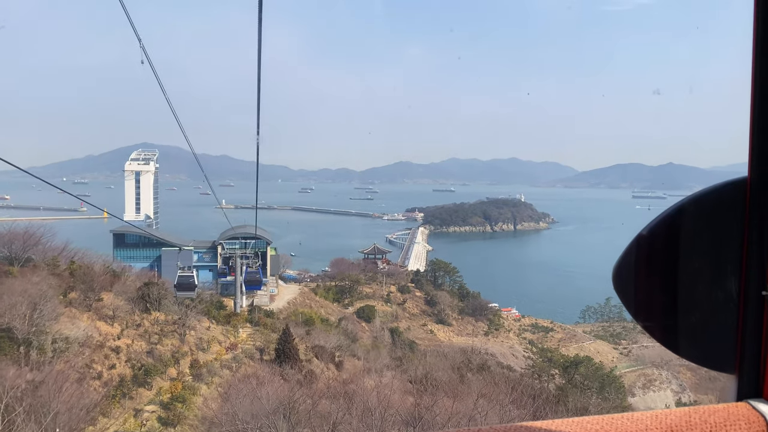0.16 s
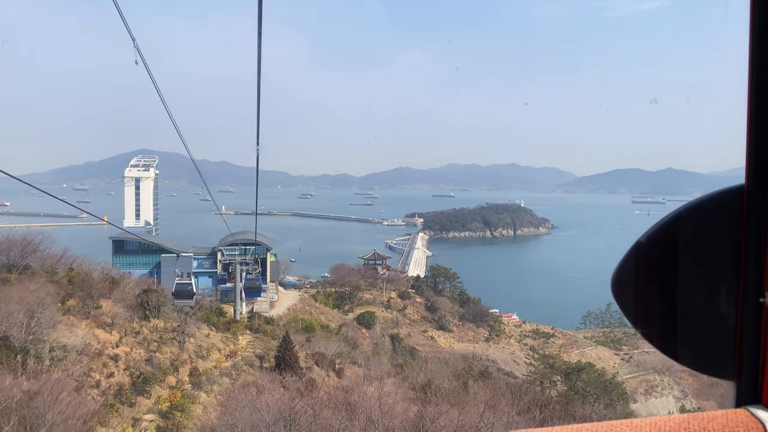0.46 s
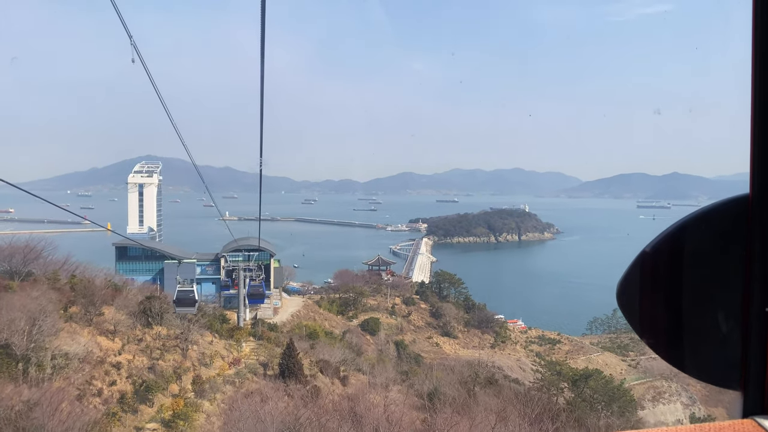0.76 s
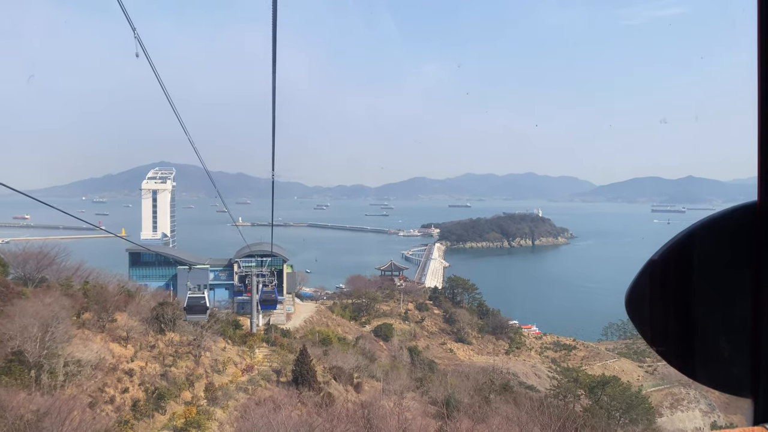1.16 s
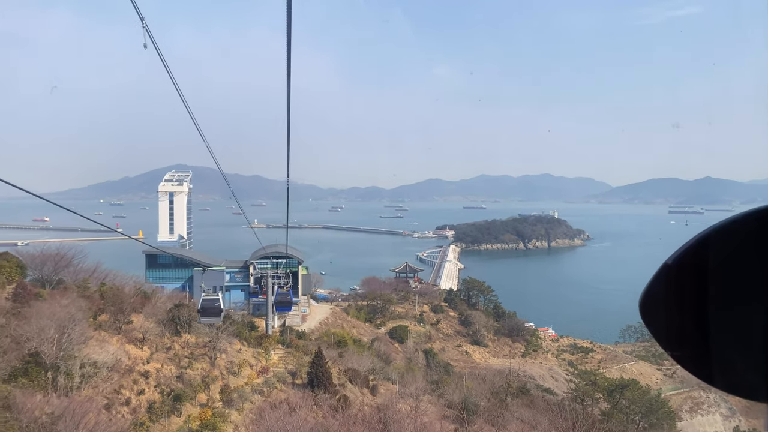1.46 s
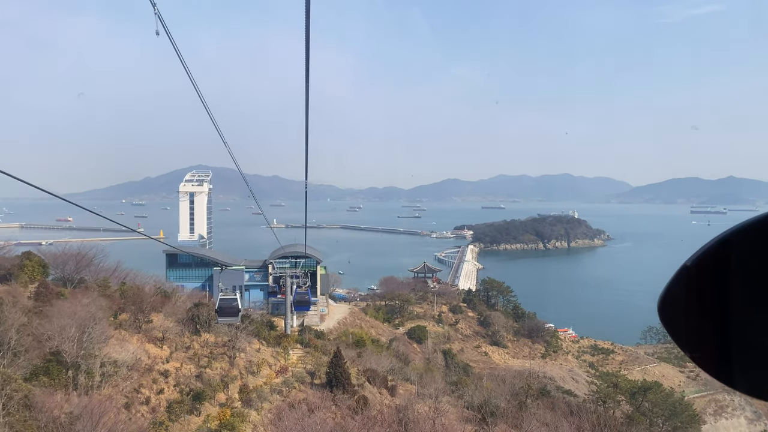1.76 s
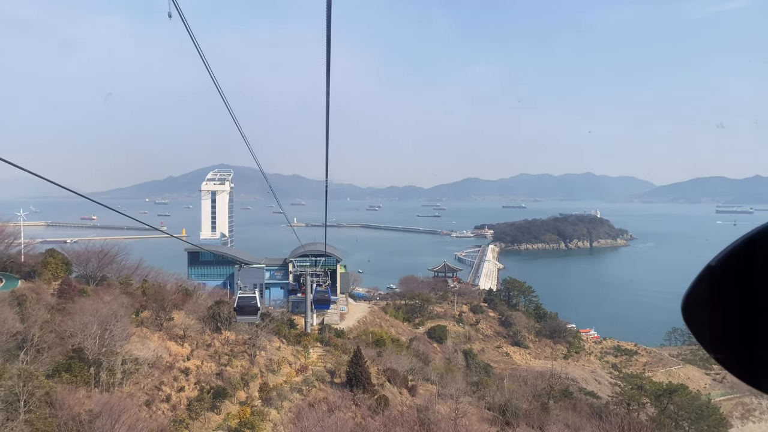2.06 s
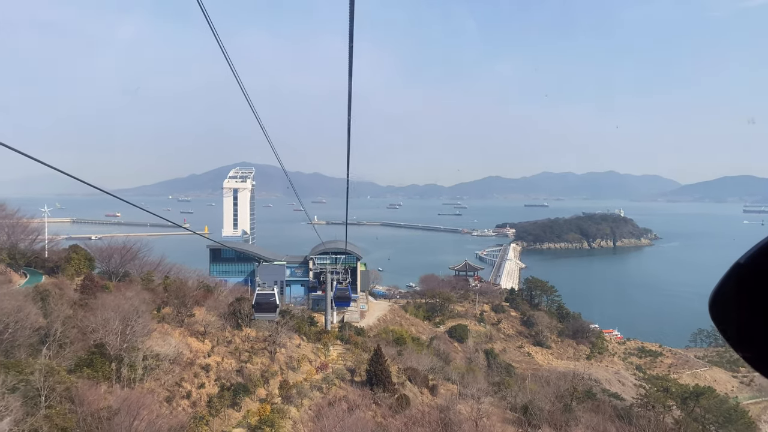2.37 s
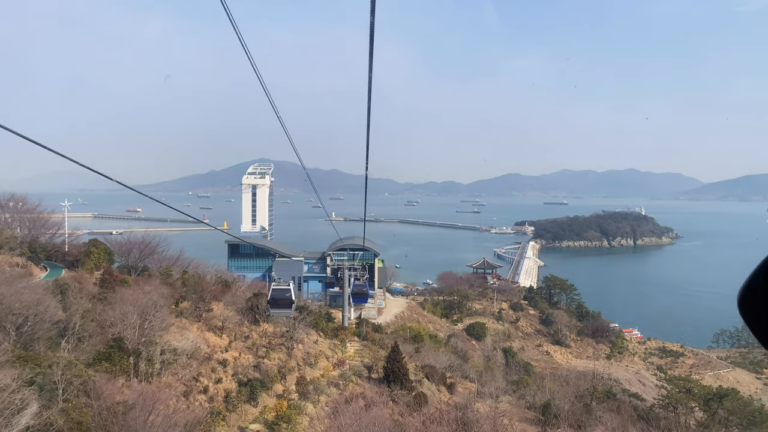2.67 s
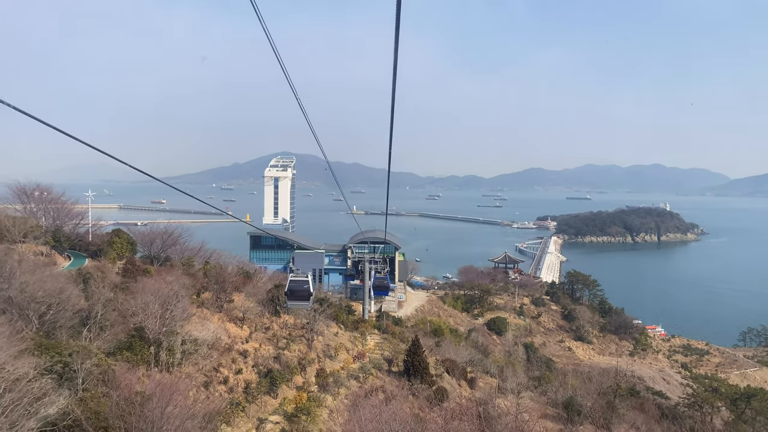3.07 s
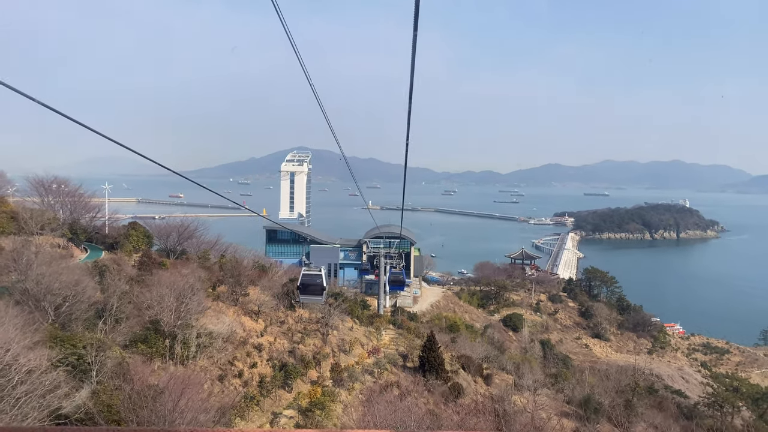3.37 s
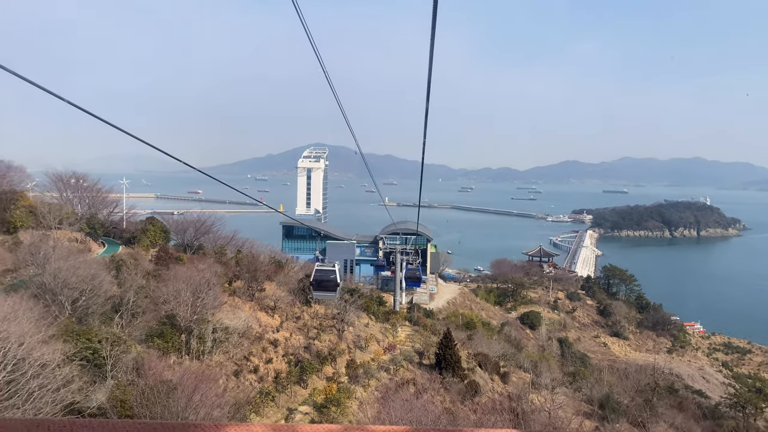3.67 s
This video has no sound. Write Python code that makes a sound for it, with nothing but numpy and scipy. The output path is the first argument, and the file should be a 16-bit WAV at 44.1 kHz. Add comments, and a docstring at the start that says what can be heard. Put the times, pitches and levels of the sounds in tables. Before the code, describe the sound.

Inside a moving cable car, a deep unsteady drone swells quickly near a support, panels thudding and loose fittings buzzing, then drops back to soft boom and muffled outside air, heard from within the cabin.

```python
"""Inside a cable car gondola: the running rope, an unsteady low sine over bass noise, shakes the cabin and swells
for about two seconds near a support. Sine hums and a throbbing boom waver in the shell over resonant noise.
Panels ring in struck modes and shudder in resonant noise with grainy scuffs; loose fittings rattle in narrow-band
bursts, and light clacks snap and ring in decaying noise. A thin noise hiss rises and fades over the outside air,
itself broad noise with gusts."""
import sys
import numpy as np
from scipy import signal
from scipy.fft import rfft, irfft, next_fast_len
from scipy.io import wavfile
from scipy.ndimage import uniform_filter1d, map_coordinates

SR = 44100
rng = np.random.default_rng(int(sys.argv[2]) if len(sys.argv) > 2 else 0)


def store_pcm(level_fs):
    """Save levels as 16-bit WAV."""
    pcm = np.round(np.clip(level_fs, -1, 1) * 32767).astype(np.int16)
    wavfile.write(sys.argv[1], SR, np.atleast_2d(pcm).T)


N = 167580  # length in samples

# In every resonance table, half-width is where the response is 6 dB down.
ROPE_HZ = 38.7  # the rope's shake at cruising speed
RISE_S, RISE_WIDTH_S, RISE_HZ = 2.2, 0.141, 3.21  # the pitch lifts as the swell lets go
# rope drone: (time [s], level [dB])
DRONE_LEVEL = [(0, -41.5), (.15, -44.5), (.3, -25.5), (.61, -23), (.96, -23), (1.07, -33), (1.17, -25),
               (1.54, -23), (1.65, -30.5), (1.82, -26.5), (2.2, -27.5), (2.32, -45), (2.4, -29),
               (2.52, -44.5), (2.68, -41), (2.84, -41), (2.95, -36), (3.8, -42.5)]
# strength of the shaking, added to RUMBLE_DB: (time [s], level [dB])
SHAKE_LEVEL = [(0, -13), (.24, -9.5), (.33, -1), (.9, 0.5), (1.13, -2.5), (1.35, 1), (1.7, -3.5),
               (2.05, -1), (2.55, -3), (2.75, -8.5), (3.8, -4.5)]
# spectrum of the rumble: (frequency [Hz], level [dB])
RUMBLE_SPECTRUM = [(20, -27.5), (32, -2.5), (48, 2), (65, 5), (82, 2), (97, -12.5), (112, 3.5), (135, -12),
                   (170, -13), (300, -73.5)]
RUMBLE_DB = -35.5

# hums of the shell, level before fading: (start [s], end [s], frequency [Hz], level [dB])
SHELL_HUMS = [(0, 0.21, 128, -43.5), (0.22, 1.017, 88, -41.5), (1.64, 2.3, 86.6, -40.5),
              (3.0, 3.897, 134, -47)]
HUM_FADE_S = 0.32  # straight fade, centred on each start and end
# throbs of the cabin's boom: (time [s], level [dB])
BOOM_THROBS = [(.36, -43), (0.721, -41), (1.261, -43.5), (2.739, -39.5), (3.127, -37.5), (3.46, -37),
               (3.781, -39.5)]
THROB_HZ, THROB_WIDTH_S = 114.5, 0.059
# cabin air resonances: (frequency [Hz], half-width [Hz], level [dB])
CABIN_MODES = [(108.5, 16, -2.5), (161.6, 20, -3.5), (198.3, 7.4, 5), (252.5, 20.1, 0.5), (288, 18, -8.5),
               (323, 17, -8.5), (384.3, 9.5, -12), (455, 14, -13.5), (511.2, 11, -13), (660.5, 16.7, -9.5),
               (766.5, 23, -19), (886, 11, -24.5)]
# level of the cabin resonances: (time [s], level [dB])
CABIN_SWELL = [(0, -48), (.6, -44), (1.1, -47.5), (1.3, -42.5), (1.55, -47), (1.75, -43), (2.05, -49),
               (2.5, -48), (3.0, -48), (3.8, -50)]

# spectrum of the outside air: (frequency [Hz], level [dB])
AIR_SPECTRUM = [(30, 2.5), (80, 9.5), (150, -5), (300, -12), (500, -10), (720, -12), (950, -18),
                (1600, -23), (1800, -25), (2200, -27.5), (2850, -35.5), (3300, -42.5), (5500, -50),
                (8000, -58.5), (15000, -52.5)]
# outside air, before gusts: (time [s], level [dB])
AIR_SWELL = [(0, -48), (1.1, -47.5), (1.8, -48.5), (2.6, -49.5), (3.6, -49.5), (3.7, -51.5)]
# resonances that colour the air noise: (frequency [Hz], half-width [Hz], level [dB])
AIR_EDGE = [(820, 68, -1), (1180, 310, 1.5), (1510, 180, -1)]
EDGE_DB = -21  # relative to the air level
# spectrum of the thin hiss: (frequency [Hz], level [dB])
HISS_SPECTRUM = [(1000, -10), (3000, 0), (5800, 3.5), (8000, -2.5), (10300, -1), (12000, -4), (14000, -3),
                 (15300, -9)]
# thin hiss, before flicker: (time [s], level [dB])
HISS_SWELL = [(0, -86), (1.0, -88.5), (1.45, -72), (1.68, -79.5), (1.85, -73.5), (2.13, -74.5),
              (2.3, -67.5), (2.6, -69), (2.8, -76.5), (3.0, -85.5), (3.2, -87), (3.31, -70.5),
              (3.45, -85.5), (3.8, -84)]
# stereo likeness of the hiss: (frequency [Hz], left-right correlation [0-1])
HISS_LIKENESS = [(3000, 0.14), (10000, 0.15)]

# light clacks, levels before attack: (time [s], ring level [dB], snap level [dB])
CLACKS = [(.302, -61, -69), (0.606, -59, -55.5), (.67, -68, -64), (1.668, -64, -74), (2.127, -63, -69.5),
          (2.8, -62, -72.5), (3.467, -68, -66.5)]
# what the clacks ring with: (frequency [Hz], half-width [Hz], level [dB])
CLACK_MODES = [(1260, 190, 1.5), (1864, 64, 3.5), (2255, 49, -3), (2500, 100, -5.5), (2930, 82, -6)]
TICK_ATTACK_S, TICK_T60_S, SNAP_T60_S = 0.0016, 0.46, 0.035

# scuffs: (time [s], bell width [s], rub level [dB], panel level [dB])
SCUFF_EVENTS = [(0.39, 0.035, -63, -52.5), (0.478, 0.039, -64, -51.5), (0.691, 0.061, -66, -50.5),
                (0.818, 0.025, -61.5, -49), (0.92, 0.072, -68, -50.5), (1.162, 0.052, -69.5, -65),
                (1.25, 0.027, -61.5, -50), (1.334, 0.022, -59.5, -55.5), (1.411, .04, -63.5, -50),
                (1.48, 0.027, -60, -57), (1.553, 0.07, -65.5, -52.5), (1.815, 0.038, -64.5, -58.5),
                (1.964, 0.044, -63.5, -53), (2.366, 0.046, -62, -49.5), (2.557, 0.095, -66, -62.5),
                (2.84, 0.054, -70.5, -62.5), (3.318, 0.059, -59, -63.5), (3.481, 0.032, -69.5, -60),
                (3.586, 0.03, -72, -54.5)]
# spectrum of the rub, also used by the snaps: (frequency [Hz], level [dB])
RUB_SPECTRUM = [(400, -1.5), (1000, -1), (1900, 1), (2400, 2), (3300, 0.5), (4600, -2), (5600, -6),
                (7300, -13), (9000, -18.5), (15000, -28)]
# resonances of the rubbed surface: (frequency [Hz], half-width [Hz], level [dB])
RUB_MODES = [(1785, 70, 7), (2563, 45, -1), (2742, 35, 1), (2907, 40, 0), (3140, 45, -1), (3575, 30, 2)]
RING_DB, GRAIN_DB, PATCHY_DB = -7, 1.8, 2.4  # surface ring; depth of the grain; depth of the band swells
# panel resonances: (frequency [Hz], half-width [Hz], level [dB])
PANEL_MODES = [(171, 19, -2), (230.5, 42, 0.5), (337, 46, 1.5), (378.6, 12, 0), (485, 53, -2),
               (550, 71, -7.5), (683, 31, -12), (769, 160, -9), (1160, 730, -18), (1840, 360, -21.5)]

# knocks on the panels, knock level before attack: (time [s], level [dB], singing panel level [dB])
KNOCK_EVENTS = [(.403, -51, -56), (.817, -43, -51.5), (.921, -43, -56), (1.247, -41, -61.5),
                (1.311, -42, -63), (1.412, -46, -54), (1.452, -47, -52.5), (2.362, -46.5, -69)]
KNOCK_ATTACK_S, KNOCK_T60_S, THUD_DB = 0.006, 0.15, -3  # the thud is relative to the ring
SING_HZ, SING_LAG_S, SING_WIDTH_S = 681.5, 0.015, 0.016

# rattles of loose fittings: (time [s], bell width [s], whistle level [dB], chatter level [dB])
RATTLE_EVENTS = [(.475, 0.016, -70.5, -66), (0.818, 0.027, -73, -71), (0.904, 0.032, -73, -74),
                 (1.247, 0.016, -65, -72.5), (1.319, 0.015, -69.5, -63.5), (1.41, .025, -71, -74),
                 (1.607, 0.016, -67, -76), (1.948, 0.0094, -60.5, -76), (2.343, .015, -64, -75)]
# whistling resonances of the fittings: (frequency [Hz], half-width [Hz], level [dB])
WHISTLE_MODES = [(3580, 42, 0), (3140, 30, -7)]
# chattering resonances of the fittings: (frequency [Hz], half-width [Hz], level [dB])
CHATTER_MODES = [(4300, 80, 0), (4580, 70, 1), (4820, 80, 0), (5650, 70, -9)]

# stereo likeness of the other noises: (frequency [Hz], left-right correlation [0-1])
LIKENESS = [(40, 0.94), (80, 0.73), (170, 0.89), (350, 0.53), (700, 0.11), (1400, 0.08), (6000, 0),
            (15000, 0)]
# stereo balance: (frequency [Hz], left over right [dB])
LEFT_LEAN = [(40, 1), (110, -1.5), (400, 0.5), (700, 1), (1300, 2), (2400, 5), (4400, 5.5), (8000, 3),
             (15000, -1)]
TOP_HZ = 15300  # upper band limit


def amp(db):
    """Decibels to gain."""
    return 10 ** (np.asarray(db) / 20)


def unit(x):
    """Scaled to rms 1."""
    return x / np.sqrt(np.mean(x ** 2) + 1e-20)


def clock():
    """Time of each sample in seconds."""
    return np.arange(N) / SR


def along(points, hz):
    """Interpolate (frequency [Hz], value) points on a log frequency axis."""
    f, v = np.transpose(points)
    return np.interp(np.log(hz + 1), np.log(f + 1), v)


def curve(rows):
    """Join (time [s], value) points with lines."""
    return np.interp(clock(), *np.transpose(rows))


def bell(s, width):
    """A Gaussian swell around time s; width is its standard deviation in seconds."""
    return np.exp(-.5 * ((clock() - s) / width) ** 2)


def wobble(rate):
    """A smooth random curve with rate knots a second."""
    knots = rng.standard_normal(int(N * rate / SR) + 4)
    return map_coordinates(knots, [clock() * rate], mode="nearest")


def filtered(x, response):
    """Multiply the spectrum of x by a response of frequency."""
    m = next_fast_len(N + SR // 2)  # spare length for the filter's tail
    return irfft(rfft(x, m) * response(np.fft.rfftfreq(m, 1 / SR)), m)[..., :N]


def slope(points):
    """Response through (frequency [Hz], level [dB]) points."""
    return lambda hz: amp(along(points, hz))


def resonant(modes):
    """Response of resonances with steep skirts, their powers added."""
    def response(hz):
        power = sum(amp(db) ** 2 / (1 + ((hz - c) / w) ** 2) ** 2 for c, w, db in modes)
        return np.sqrt(power)
    return response


def noise(response, lean=1, alike=LIKENESS):
    """Shaped stereo noise of rms 1; mid and side set its width, a balance curve scaled by lean tilts it."""
    def mid_side(hz):
        turn = np.arccos(np.clip(along(alike, hz), -1, 1)) / 2
        return response(hz) * np.array([np.cos(turn), np.sin(turn)])

    mid, side = filtered(rng.standard_normal((2, N)), mid_side)
    stereo = np.array([mid + side, mid - side])
    return unit(filtered(stereo, lambda hz: amp(lean * np.outer([.5, -.5], along(LEFT_LEAN, hz)))))


def tone(hz, drift_hz, waver_db):
    """A stereo sine of rms near 1 whose pitch drifts and level wavers at random."""
    phase = 2 * np.pi * (np.cumsum(hz + drift_hz * wobble(8)) / SR + rng.random())
    sides = amp(np.array([[.5], [-.5]]) * along(LEFT_LEAN, np.mean(hz)))
    return np.sqrt(2) * np.sin(phase) * amp(waver_db * wobble(18)) * sides


def struck(s, attack, t60):
    """Envelope of a blow at time s: a quick rise under a 60 dB decay in t60 seconds."""
    age = np.maximum(clock() - s, 0)
    return (1 - np.exp(-age / attack)) * amp(-60 * age / t60)


def patchy(x, depth_db):
    """Narrow bands of x swell and sink by chance, so its colour keeps changing."""
    z = signal.stft(x, nperseg=1024)[2]
    field = rng.standard_normal(z.shape[1:])
    field = uniform_filter1d(field, size=4, axis=0)  # smooth over frequency
    field = uniform_filter1d(field, size=7, axis=1)  # smooth over time
    return unit(signal.istft(z * amp(depth_db * unit(field)), nperseg=1024)[1][:, :N])


def rope():
    """The running rope shakes the cabin: a deep sine drone in a bed of bass noise."""
    pitch = ROPE_HZ + RISE_HZ * bell(RISE_S, RISE_WIDTH_S)
    drone = amp(curve(DRONE_LEVEL)) * tone(pitch, drift_hz=0.16, waver_db=0.87)
    rumble = amp(RUMBLE_DB + curve(SHAKE_LEVEL)) * noise(slope(RUMBLE_SPECTRUM))
    return drone + rumble


def shell():
    """Shell hums come and go, the boom throbs, and the cabin air resonates in noise that swells and sinks."""
    t = clock()
    hums = 0
    for start, end, hz, db in SHELL_HUMS:
        gate = np.clip(np.minimum(t - start, end - t) / HUM_FADE_S + .5, 0, 1)
        hums = hums + amp(db) * gate * tone(hz, drift_hz=0.71, waver_db=1.3)
    throbs = sum(amp(db) * bell(s, THROB_WIDTH_S) for s, db in BOOM_THROBS)
    boom = throbs * tone(THROB_HZ, drift_hz=0.57, waver_db=-1.6)
    cabin = amp(curve(CABIN_SWELL)) * noise(resonant(CABIN_MODES))
    return hums + boom + cabin


def air():
    """Outside air through the windows: gusting noise, a resonant edge and a thin flickering hiss."""
    gusts, flicker = .8 * wobble(6), .8 * wobble(15)  # dB
    level = curve(AIR_SWELL)
    outside = amp(level + gusts) * noise(slope(AIR_SPECTRUM))
    edge = amp(level + EDGE_DB) * patchy(noise(resonant(AIR_EDGE)), PATCHY_DB)
    thin = noise(slope(HISS_SPECTRUM), lean=0.28, alike=HISS_LIKENESS)
    return outside + edge + amp(curve(HISS_SWELL) + flicker) * thin


def ticks():
    """Light clacks: a short broadband snap with a longer resonant ring, both decaying noise."""
    ring = sum(amp(db) * struck(s, TICK_ATTACK_S, TICK_T60_S) for s, db, _ in CLACKS)
    snap = sum(amp(db) * struck(s, TICK_ATTACK_S, SNAP_T60_S) for s, _, db in CLACKS)
    return ring * noise(resonant(CLACK_MODES)) + snap * noise(slope(RUB_SPECTRUM))


def scuffs():
    """Short rubs of grainy friction noise with surface resonances; the panels shudder with each."""
    rub = np.sqrt(sum((amp(db) * bell(s, width)) ** 2 for s, width, db, _ in SCUFF_EVENTS))
    shudder = np.sqrt(sum((amp(db) * bell(s, width)) ** 2 for s, width, _, db in SCUFF_EVENTS))
    grain = unit(amp(GRAIN_DB * wobble(300) + .8 * wobble(45)))  # fine and coarse roughness
    surface = amp(RING_DB) * noise(resonant(RUB_MODES))
    friction = patchy(grain * noise(slope(RUB_SPECTRUM)) + surface, PATCHY_DB)
    return rub * friction + shudder * noise(resonant(PANEL_MODES))


def knocks():
    """Each jolt rings the panel modes anew with a dull noise thud; one panel sings on just after it."""
    t = clock()
    thud = noise(resonant(PANEL_MODES))
    sing = tone(SING_HZ, drift_hz=4, waver_db=.5)
    out = np.zeros((2, N))
    for s, db, sing_db in KNOCK_EVENTS:
        ring = 0
        for hz, width, level in PANEL_MODES:
            # every blow excites each mode a little differently
            strength = amp(level + rng.normal(0, 2.2))
            pitch = hz + rng.normal(0, width / 4)
            ring = ring + strength * np.sin(2 * np.pi * pitch * (t - s))
        blow = amp(db) * struck(s, KNOCK_ATTACK_S, KNOCK_T60_S)
        out += blow * (unit(ring) + amp(THUD_DB) * thud)
        out += amp(sing_db) * bell(s + SING_LAG_S, SING_WIDTH_S) * sing
    return out


def rattles():
    """Loose fittings buzz in short bursts of resonant noise: a narrow whistle and a higher chatter."""
    whistle = sum(amp(db) * bell(s, width) for s, width, db, _ in RATTLE_EVENTS)
    chatter = sum(amp(db) * bell(s, width) for s, width, _, db in RATTLE_EVENTS)
    return whistle * noise(resonant(WHISTLE_MODES)) + chatter * noise(resonant(CHATTER_MODES))


def scene():
    """Everything heard from the seat."""
    return rope() + shell() + air() + ticks() + scuffs() + knocks() + rattles()


def record(dry):
    """Cut everything from the band limit upward."""
    return filtered(dry, lambda hz: hz < TOP_HZ)


dry = scene()
out = record(dry)
store_pcm(out)
```